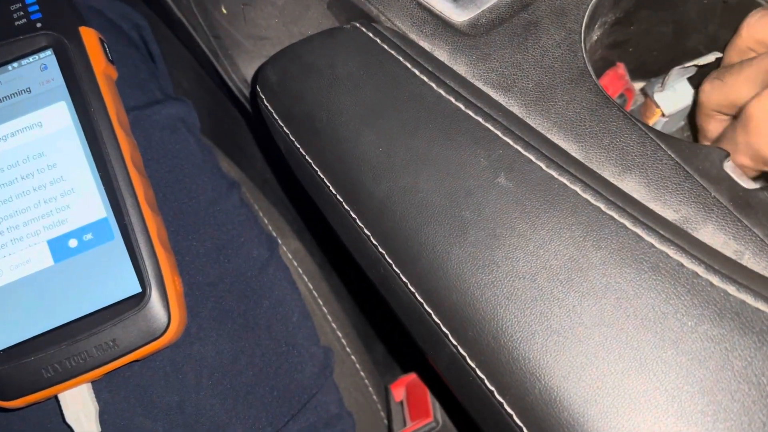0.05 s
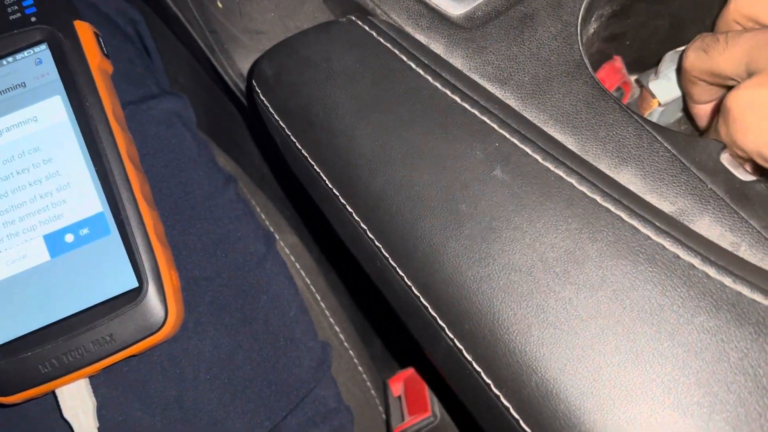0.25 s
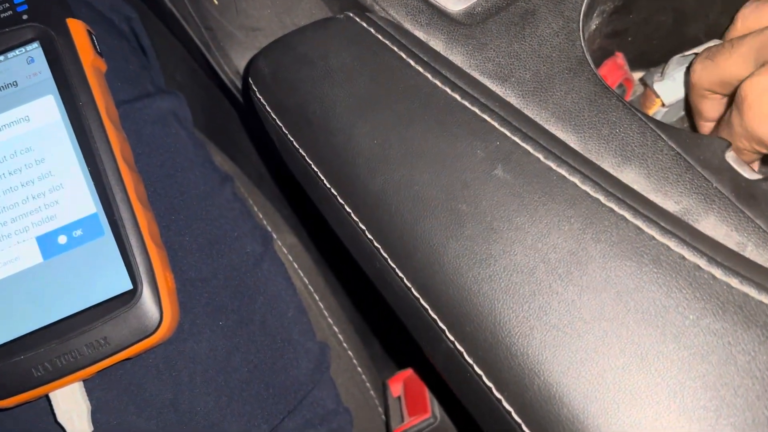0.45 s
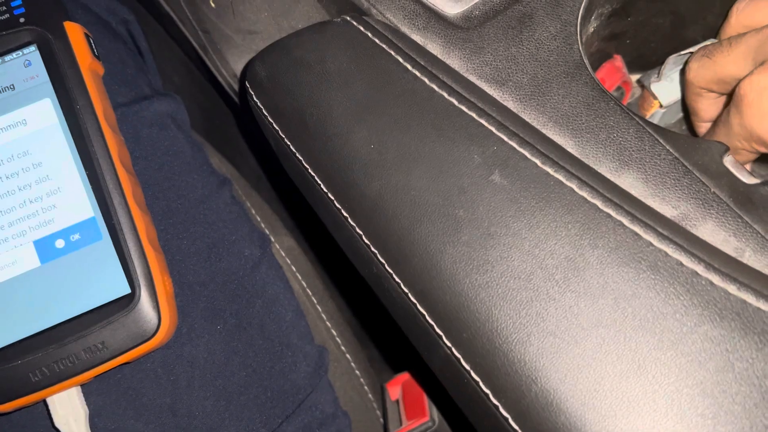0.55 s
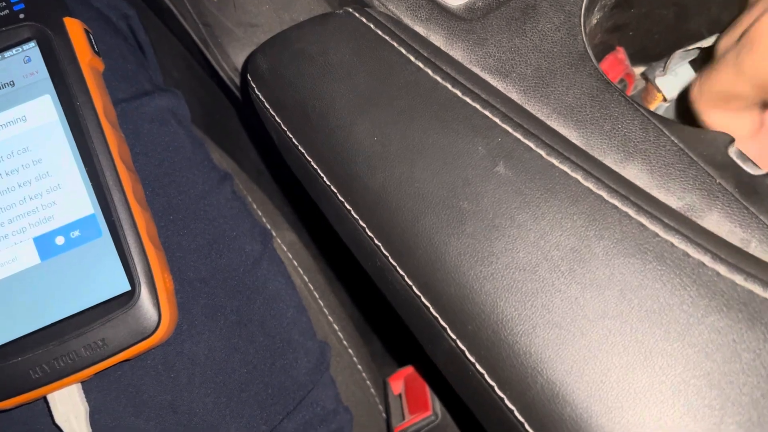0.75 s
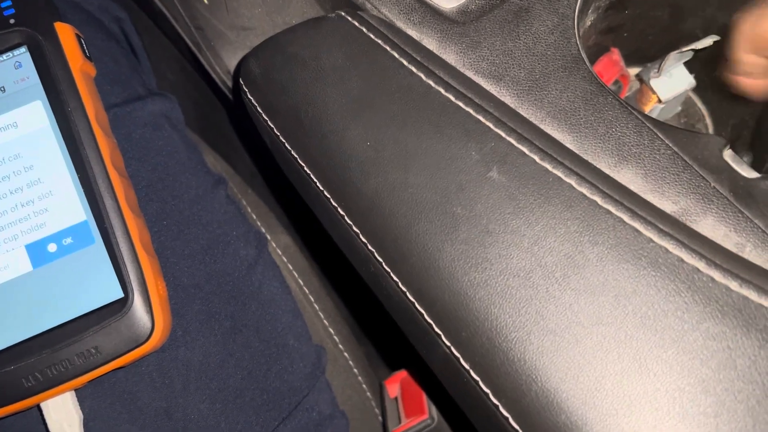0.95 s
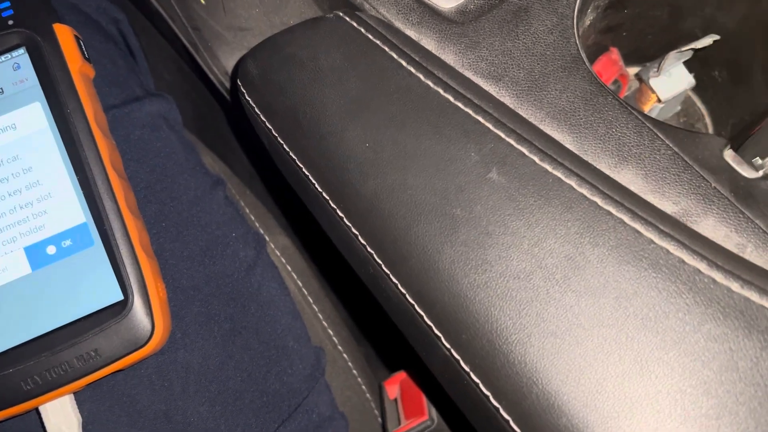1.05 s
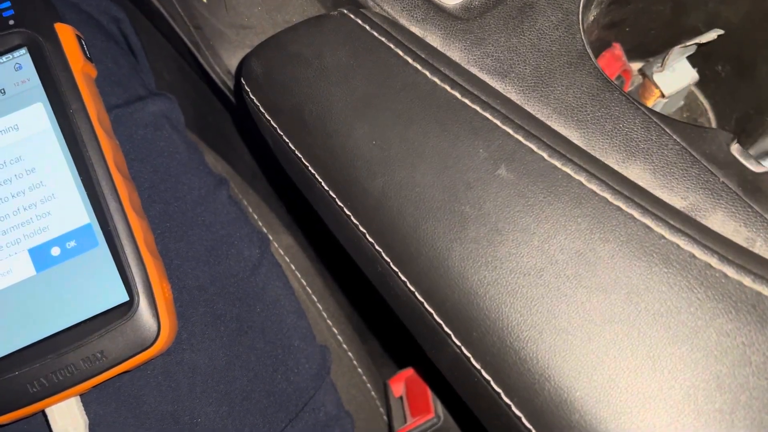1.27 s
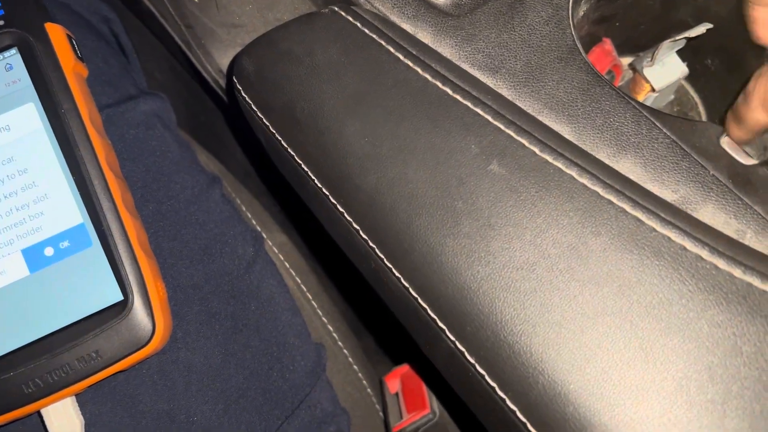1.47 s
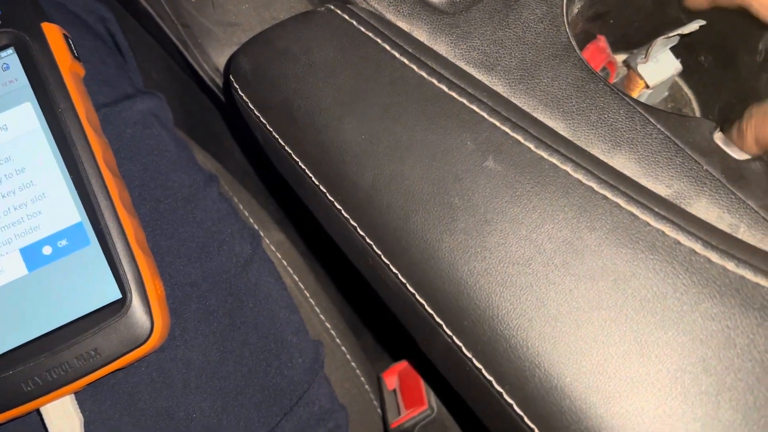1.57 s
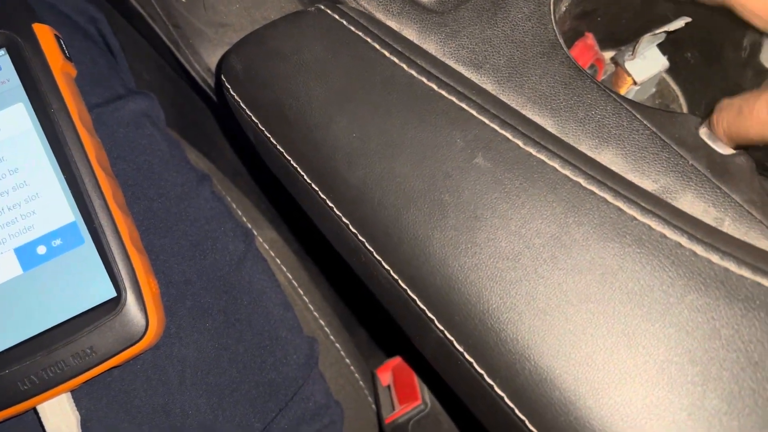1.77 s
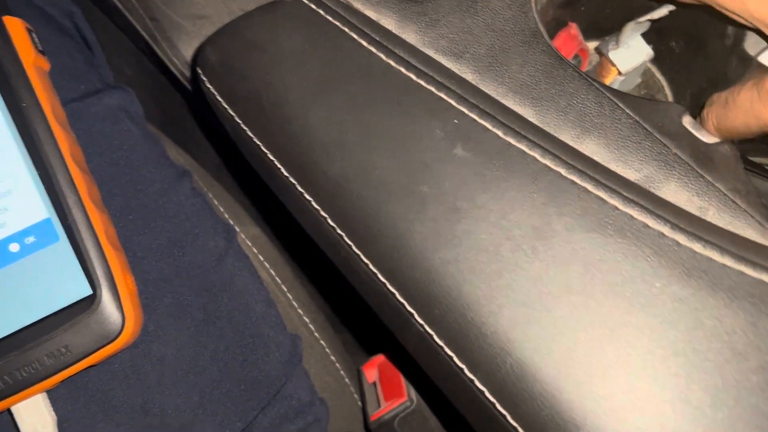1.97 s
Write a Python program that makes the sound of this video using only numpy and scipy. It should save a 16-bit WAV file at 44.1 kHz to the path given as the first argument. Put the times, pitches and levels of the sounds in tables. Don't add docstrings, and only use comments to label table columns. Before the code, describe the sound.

Close, dry plastic knocks inside a parked car: faint taps first, a sudden loud rattle, a denser run of hollow clacks, a short lull, then softer pushes and near quiet, slightly to the right.

```python
import sys
import numpy as np
from scipy import signal
from scipy.fft import rfft, irfft
from scipy.io import wavfile
from scipy.ndimage import uniform_filter1d

SR = 44100
rng = np.random.default_rng(int(sys.argv[2]) if len(sys.argv) > 2 else 0)


def wav_record(signal):
    frames = np.transpose(np.atleast_2d(signal))
    bounded = np.clip(frames, -1, 1)
    quanta = np.round(bounded * 32767).astype(np.int16)
    wavfile.write(sys.argv[1], SR, quanta)


def volts_from_decibels(level):
    exponent = np.asarray(level, float) / 20
    return 10 ** exponent


N = 88817

# frequency in Hz, level in dB, t60 in seconds,
# phase lead of the left port in radians.
CONSOLE_MODES = [(137.7, -1, 0.13, -0.02), (235.6, 1, 0.09, 0.58), (293.7, -4.5, 0.073, -0.08),
                 (401.2, -1, 0.054, -0.48), (554.3, 0, 0.042, -0.5), (603.7, -2.5, 0.038, -1.2),
                 (660, -2.5, 0.034, -0.9), (706, -9.5, 0.02, -0.67), (846.4, -8, 0.052, -1.5),
                 (990, -3.5, 0.032, 1.1), (1135.6, -8.5, 0.047, 1.33), (1180, -13, 0.048, -0.22)]
# frequency in Hz, left-right likeness (-1 to 1).
PORT_LIKENESS = [(60, 0.9), (240, 0.75), (950, -0.27), (3770, 0.4), (15000, -0.77)]


def evened(x):
    return x / np.sqrt(np.mean(x ** 2) + 1e-20)


def read(points, hz):
    f, value = np.transpose(points)
    return np.interp(np.log(hz + 1), np.log(f + 1), value)


def add(mix, s, sound):
    part = mix[..., max(round(s * SR), 0):][..., :sound.shape[-1]]
    part += sound[..., :part.shape[-1]]


def ports(x):
    lag_s, lagged = 0.00028, 0.64
    hz = np.fft.rfftfreq(len(x), 1 / SR)
    late = irfft(rfft(x) * np.exp(-2j * np.pi * hz * lag_s), len(x))
    left = (1 - lagged) * x + lagged * late
    return np.array([left * np.linalg.norm(x) / np.linalg.norm(left), x])


def ring(hz, db, t60, lead, length=0.2):
    rise_cycles = 0.7
    t = np.arange(0, length, 1 / SR)[:, None]
    swell = 1 - np.exp(-(t * hz / rise_cycles) ** 2)
    fade = volts_from_decibels(db - 60 * t / np.maximum(t60, 0.003)) * swell
    return np.array([(fade * np.sin(2 * np.pi * hz * t + side * lead / 2)).sum(1) for side in (1, -1)])


def struck(ringing, blow, db):
    out = signal.fftconvolve(ringing, blow[None], axes=1)
    return volts_from_decibels(db) * out / abs(out).max()


def console_blow(db, centre_hz, upper_db, upper_hz, mode_luck, chatter):
    hz, level, t60, lead = np.transpose(CONSOLE_MODES)
    low = hz < 900
    low_octaves = np.log2(hz / centre_hz) / 0.55
    upper_octaves = np.log2(hz / upper_hz) / 0.14
    level = level - 6 * np.where(low, low_octaves, upper_octaves) ** 2
    level = level + 2.5 * mode_luck[:len(hz)]
    hz = hz * (1 + 0.012 * mode_luck[-len(hz):])
    belly = hz < 330

    t = np.arange(2048) / SR
    blow = ((t == 0) + 0.04 * np.exp(-t / 0.0015) * chatter)[:600]
    body_late_s, belly_late_s = 0.001168, 0.00476
    out = np.zeros((2, SR // 3))
    for part, rel_db, late_s in (
        (low, 2.5, body_late_s),
        (~low, upper_db + 3.5, body_late_s),
        (belly, -12, belly_late_s),
    ):
        ringing = ring(hz[part], level[part], t60[part], lead[part])
        add(out, late_s, struck(ringing, blow, db + rel_db))
    return out


def crack(noise, colour, tail_db):
    t = np.arange(2048) / SR
    attack = np.minimum(t / 0.00037, 1)
    fade = attack * (np.exp(-t / 0.002) + volts_from_decibels(tail_db) * np.exp(-t / 0.0086))
    burst = fade * irfft(rfft(noise) * volts_from_decibels(read(colour, np.fft.rfftfreq(2048, 1 / SR))))
    return ports(burst / abs(burst).max())


def knock(db, centre_hz, upper_db, tick_db, upper_hz):
    # frequency in Hz, level in dB per Hz.
    shell_colour = [(880, -3.5), (1500, -14.5), (1690, -12.5), (1790, 4), (3160, -11.5), (3570, -16),
                    (3790, -7), (4570, -17.5), (5000, -32), (6500, -60.5), (11000, -120)]
    # frequency in Hz, level in dB per Hz.
    top_colour = [(2940, -32.5), (5000, 2.5), (6290, -3.5), (9200, -8), (10500, -25), (11600, -16),
                  (13700, -20), (15400, -20), (16500, -28)]
    luck = rng.standard_normal((4, 2048))
    out = console_blow(db, centre_hz, upper_db, upper_hz, luck[0], luck[1])
    crack_db = db + tick_db + 4
    top_db = crack_db - 3 + 0.46 * db
    add(out, 0, volts_from_decibels(crack_db) * crack(luck[2], shell_colour, tail_db=-8))
    add(out, 0, volts_from_decibels(top_db) * crack(luck[3], top_colour, tail_db=-28))
    return out


def knocks():
    # start in seconds, peak in dB, body centre in Hz,
    # upper modes in dB relative, tick in dB relative.
    fumbles = [(0.031, -33.5, 510, -13.5, -41), (0.171, -42.5, 330, -37, -3), (0.253, -44.5, 295, -31, -31),
               (0.342, -31.5, 320, 1, -4.5), (0.663, -35.5, 607, -6, -27), (0.679, -25, 655, -23, -22),
               (0.687, -20.5, 600, -21, -10.5), (0.696, -18.5, 780, -23, -15),
               (0.709, -3.5, 533, -4.5, -12.5), (0.717, -15.5, 614, -9, -30),
               (0.726, -16.5, 570, -7, -11.5), (0.735, -29.5, 603, 0, -18), (0.744, -45, 400, 7, -6),
               (0.751, -36.5, 290, -3, 7), (0.789, -14, 790, -1.5, -1.5), (0.84, -29.5, 414, -11.5, -13.5),
               (0.89, -22, 600, -12, -10.5), (0.896, -26.5, 390, -25, -15.5), (0.926, -38.5, 808, -17, -32),
               (0.933, -10.5, 677, -5.5, -12), (0.942, -18.5, 299, -33.5, -15.5),
               (1.087, -15.5, 640, -11, -18.5), (1.092, -25, 393, -17, -21), (1.143, -37, 597, -0.5, -17.5)]
    # start in seconds, peak in dB, body centre in Hz,
    # upper modes in dB relative, tick in dB relative.
    seating = [(1.186, -37, 710, -10.5, -10), (1.192, -4.5, 541, -5.5, -14), (1.204, -8, 507, -17, -31),
               (1.212, -20, 555, -22, -28), (1.221, -16.5, 600, -22.5, -28.5), (1.229, -3.5, 510, -9, -8),
               (1.267, -17, 616, -13.5, -22), (1.272, -15.5, 507, -36, -16.5), (1.305, -26, 576, -8, -8),
               (1.31, -18.5, 570, -26, -11), (1.316, -24.5, 302, -30, 1.5), (1.323, -4.5, 580, -7.5, -10),
               (1.35, -24.5, 530, -30.5, -12.5), (1.371, -26, 370, -10, -13),
               (1.392, -13.5, 650, -16.5, -10), (1.396, -15, 534, -19, -15), (1.4273, -19, 550, -14, -5),
               (1.447, -22, 560, -31.5, -39), (1.457, -44, 343, -15, -37)]
    # start in seconds, peak in dB, body centre in Hz,
    # upper modes in dB relative, tick in dB relative.
    pushes = [(1.616, -33, 293, -14, -12.5), (1.643, -41, 270, -9.5, -29.5),
              (1.667, -40.5, 296, -15.5, -34), (1.739, -26, 622, -13, -16.5), (1.751, -37.5, 269, -7, -10),
              (1.767, -41, 600, 4, -20), (1.775, -32, 580, -3.5, -11), (1.778, -22, 393, -20, -38),
              (1.796, -19.5, 396, -16.5, -20), (1.8, -30.5, 550, -5, -13.5), (1.812, -21, 560, -9.5, -15.5),
              (1.833, -19.5, 463, -23, -37.5), (1.852, -27.5, 277, -36, -29), (1.865, -34, 511, -29, -10),
              (1.873, -21, 670, -5, -15.5), (1.876, -19, 640, -6, -17.5), (1.884, -22.5, 263, -41, -15.5)]
    upper_spots = (1056, 1144, 1051)
    out = np.zeros((2, N))
    for group, upper_hz in zip((fumbles, seating, pushes), upper_spots):
        for s, *blow in group:
            add(out, s, knock(*blow, upper_hz))
    return out


def singing_parts():
    # start in seconds, peak in dB, frequency in Hz, t60 in seconds.
    sung = [(.254, -42, 547, 0.028), (.687, -48, 3860, .01), (.696, -33.5, 3830, .01),
            (.7095, -16, 2970, .008), (.743, -30, 3770, 0.011), (.789, -26, 3700, 0.009),
            (.343, -25, 705, .03), (.344, -31.5, 296.3, 0.07), (.789, -12, 719, 0.025),
            (0.935, -10, 990, 0.024), (.9345, -8.5, 684, 0.035), (0.936, -23.5, 3050, .01),
            (.935, -31, 2080, 0.03), (1.088, -38.5, 2350, 0.047), (1.088, -22, 923, .025),
            (1.1925, -17.5, 6200, 0.0049), (1.194, -7.5, 1165, 0.03), (1.2295, -8, 3657, 0.016),
            (1.273, -31.5, 3560, 0.012), (1.326, -7, 1215, 0.025), (1.3925, -23.5, 3510, 0.0058),
            (1.427, -31, 2890, .008), (1.618, -32.5, 571, 0.05), (1.62, -27, 295.4, 0.064),
            (1.644, -36, 605, 0.033), (1.776, -34.5, 7100, 0.0045), (1.7788, -13, 438, 0.014),
            (1.813, -30, 563, 0.038), (1.8775, -30, 2520, 0.018)]
    out = np.zeros((2, N))
    for s, db, hz, t60 in sung:
        tone = ring(hz, 0, t60, 0, length=0.12)[0]
        add(out, s, volts_from_decibels(db) * ports(tone / abs(tone).max()))
    return out


def rubbing(column):
    # start in seconds, length in seconds, hiss in dB, console murmur in dB.
    rubs = [(0.092, 0.038, -64, -49), (0.123, 0.07, -67, -48), (0.269, 0.092, -60.5, -48),
            (0.413, 0.047, -62, -56), (0.496, 0.0464, -63, -74.5), (0.643, 0.12, -53.5, -31.5),
            (0.714, 0.058, -52.5, -42), (0.767, 0.049, -53, -35.5), (0.837, 0.03, -62.5, -39.5),
            (1.058, 0.02, -74.5, -49), (1.135, 0.047, -60.5, -41), (1.178, 0.099, -60.5, -31),
            (1.299, 0.048, -40, -28), (1.351, .13, -60.5, -33), (1.447, 0.1, -68, -62.5),
            (1.658, 0.023, -53.5, -41.5), (1.752, 0.041, -47, -33), (1.8, 0.097, -69.5, -43.5),
            (1.984, 0.015, -70, -83.5)]
    level = np.zeros(N)
    for row in rubs:
        u = np.arange(0, row[1], 1 / SR) / row[1]
        add(level, row[0], volts_from_decibels(row[column]) * np.sin(np.pi * u ** 1.3) ** 0.9)
    return level


def drag():
    slips_per_s = 700
    slips = (rng.random(N) < slips_per_s / SR) * rng.standard_normal(N)
    slips = slips * volts_from_decibels(1.5 * rng.exponential(1, N).clip(0, 4))
    body = ring(*np.transpose(CONSOLE_MODES))
    body = body / np.linalg.norm(body[0])
    rubbed = evened(slips) * rubbing(column=3)
    return signal.fftconvolve(body, rubbed[None], axes=1)[:, :N]


def coloured(points, same, patchy_db):
    frames, hz = N // 256 + 5, np.fft.rfftfreq(1024, 1 / SR)
    a, b, c, d, patches = rng.standard_normal((frames, 513, 5)).T
    patches = uniform_filter1d(patches, size=8, axis=0)
    patches = evened(uniform_filter1d(patches, size=6, axis=1))
    same = np.clip(same * np.ones(len(hz)), -1, 1)[:, None]
    left, other = a + 1j * b, c + 1j * d
    z = np.array([left, same * left + np.sqrt(1 - same ** 2) * other])
    z = z * volts_from_decibels(read(points, hz)[:, None] + patchy_db * patches)
    return evened(signal.istft(z, nperseg=1024, noverlap=768)[1][:, :N])


def scuffs():
    # frequency in Hz, level in dB per Hz.
    skin_colour = [(800, -22), (1800, -6), (3900, -6), (9300, -10), (10500, -38), (12400, -21),
                   (13800, -42), (15400, -19)]
    grain = volts_from_decibels(3.5 * evened(uniform_filter1d(rng.standard_normal(N), size=90)))
    hiss = coloured(skin_colour, 0.83, patchy_db=3.0)[0]
    return ports(hiss * rubbing(column=2) * grain)


def seat_thuds():
    # start in seconds, level in dB, frequency in Hz.
    bumps = [
        (0.949, -32.5, 63),
        (1.25, -32, 70),
    ]
    out = np.zeros((2, N))
    for s, db, hz in bumps:
        t = np.arange(0, 3.5 / hz, 1 / SR)
        swell = np.sin(np.pi * t / t[-1]) ** 2
        add(out, s, volts_from_decibels(db) * swell * np.sin(2 * np.pi * hz * t) * np.ones((2, 1)))
    return out


def cabin(x):
    # frequency in Hz, t60 in seconds.
    decay = [(150, .12), (500, .08), (2000, .06), (8000, .04)]
    taps = np.zeros((2, SR // 4))
    at = np.arange(60, SR // 4 - 20, 20)
    signs = (rng.integers(0, 20, (2, len(at))), rng.choice([-1., 1.], (2, len(at))))
    np.put_along_axis(taps, at + signs[0], signs[1], 1)
    hz, t, z = signal.stft(taps, SR, nperseg=256)
    same = np.clip(read(PORT_LIKENESS, hz), 0, 1)[:, None]
    z = np.array([z[0], same * z[0] + np.sqrt(1 - same ** 2) * z[1]])
    tail = signal.istft(z * volts_from_decibels(-60 * t / read(decay, hz)[:, None]), SR, nperseg=256)[1]
    return signal.fftconvolve(x, tail / np.linalg.norm(tail[0]), axes=1)[:, :N]


def cabin_hum():
    # frequency in Hz, level in dB per Hz.
    hum_colour = [(22, 16), (50, 11), (120, -4.5), (706, -16.5), (1640, -19.5), (5570, -31.5), (10400, -42),
                  (15200, -71), (16500, -72.5)]
    same = read(PORT_LIKENESS, np.fft.rfftfreq(1024, 1 / SR))
    return volts_from_decibels(-47) * coloured(hum_colour, same, patchy_db=2.0)


def scene():
    fob = knocks() + singing_parts() + drag() + scuffs() + seat_thuds()
    fob = fob + volts_from_decibels(-19) * cabin(fob)
    left_db = -2.7
    fob = fob * volts_from_decibels(np.array([[left_db / 2], [-left_db / 2]]))
    return fob + cabin_hum()


def band_limit(x):
    return signal.sosfilt(signal.butter(12, 16970, fs=SR, output="sos"), x)


def record(dry):
    bass_cut = signal.lfilter(*signal.butter(2, 40, "high", fs=SR), dry)
    limited = np.tanh(bass_cut / 1.034) * 1.005
    edge = signal.firwin(255, 16400, window=("kaiser", 9), fs=SR)
    return band_limit(signal.oaconvolve(limited, edge[None], "same", axes=1))


dry = scene()
out = record(dry)
wav_record(out)
```